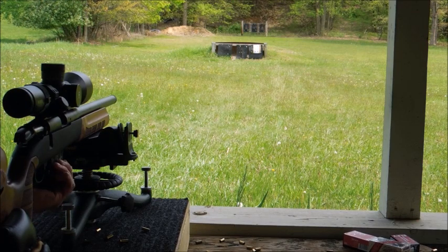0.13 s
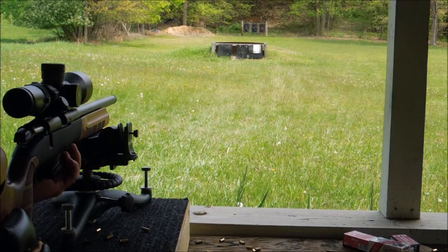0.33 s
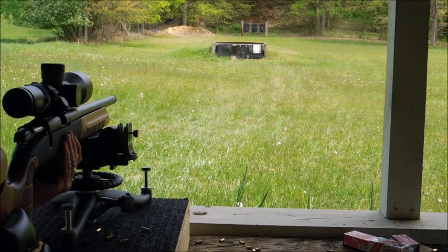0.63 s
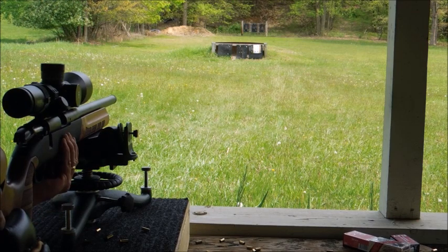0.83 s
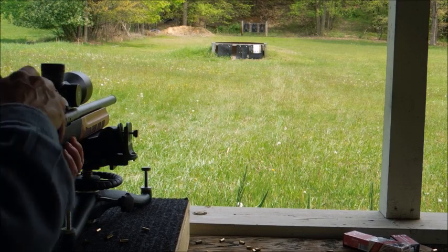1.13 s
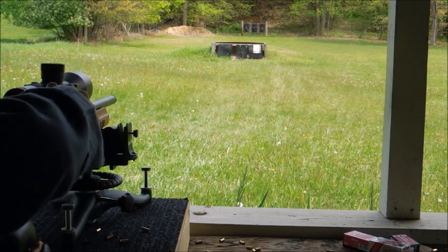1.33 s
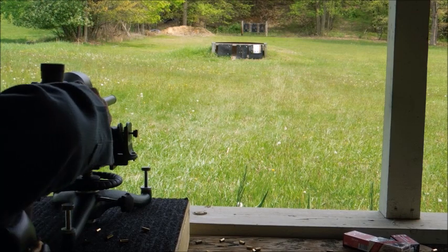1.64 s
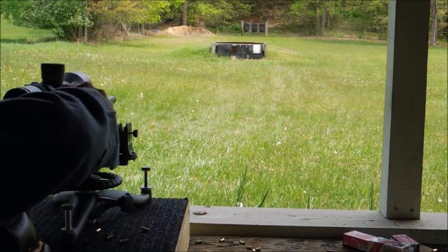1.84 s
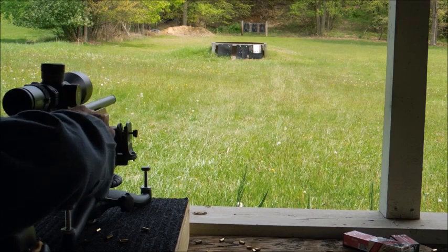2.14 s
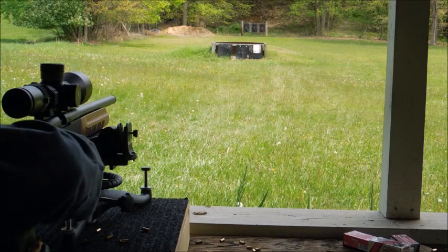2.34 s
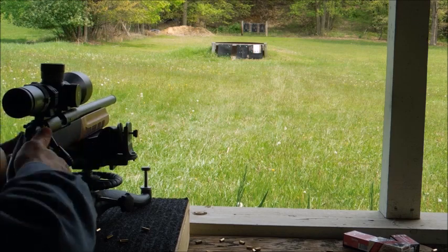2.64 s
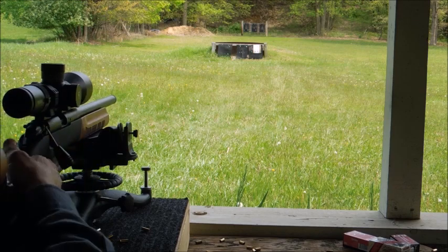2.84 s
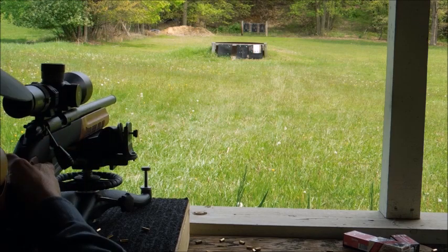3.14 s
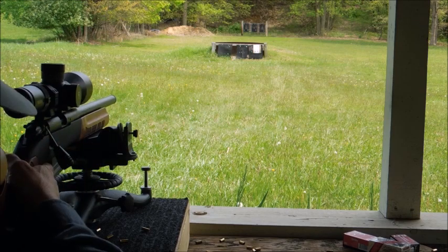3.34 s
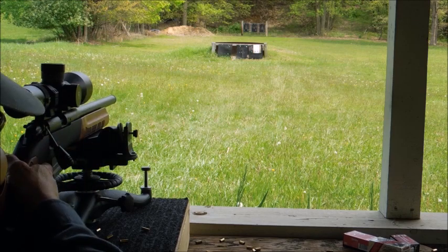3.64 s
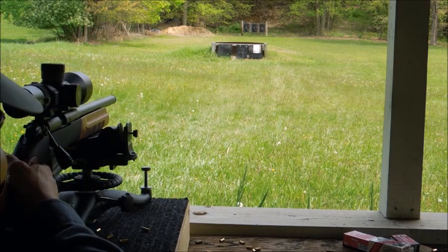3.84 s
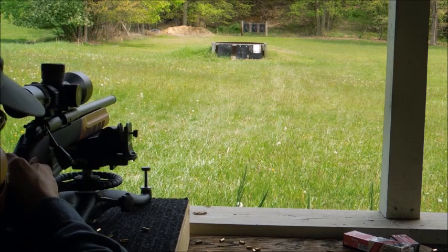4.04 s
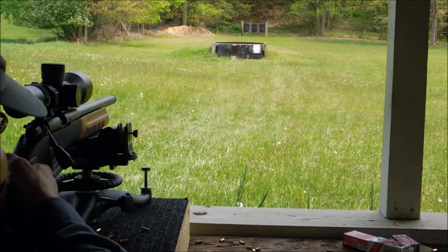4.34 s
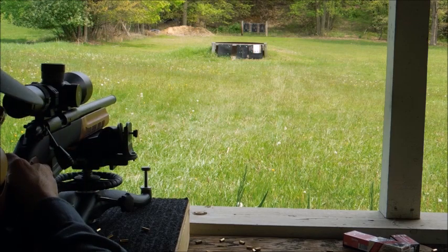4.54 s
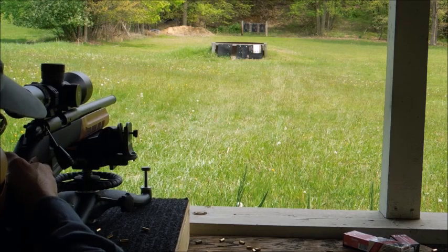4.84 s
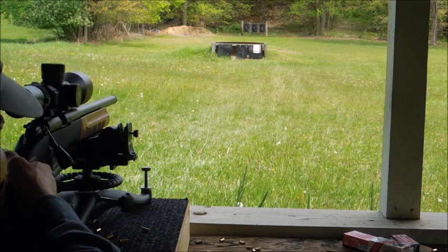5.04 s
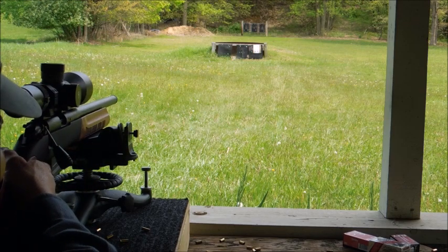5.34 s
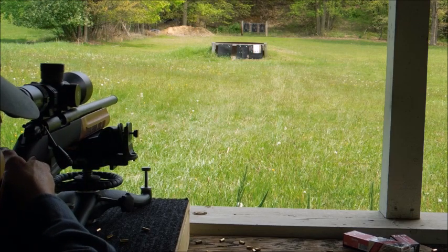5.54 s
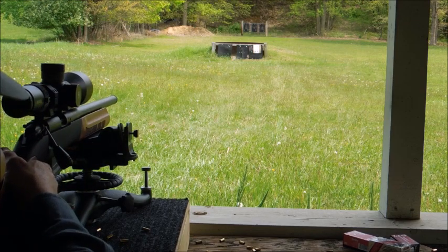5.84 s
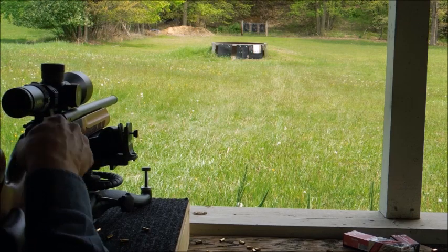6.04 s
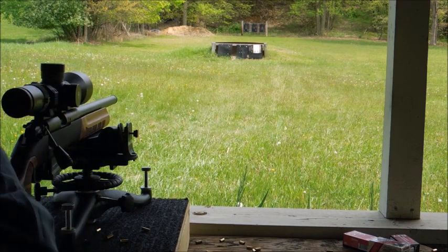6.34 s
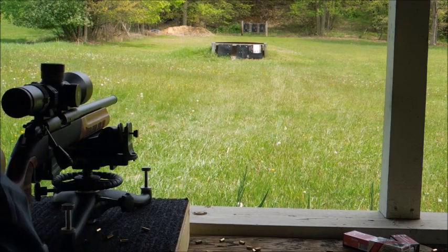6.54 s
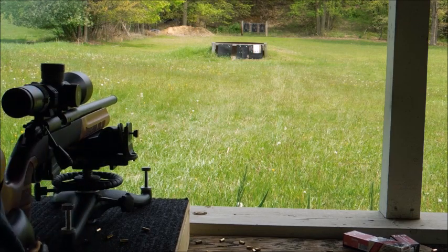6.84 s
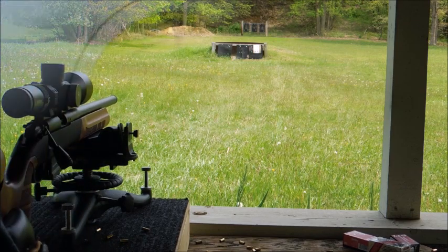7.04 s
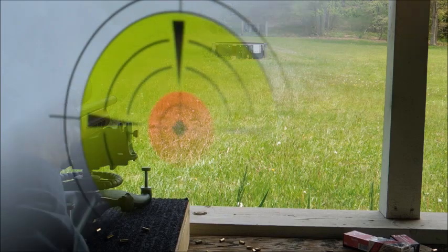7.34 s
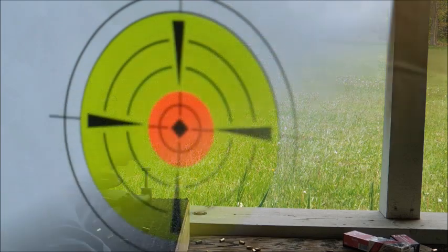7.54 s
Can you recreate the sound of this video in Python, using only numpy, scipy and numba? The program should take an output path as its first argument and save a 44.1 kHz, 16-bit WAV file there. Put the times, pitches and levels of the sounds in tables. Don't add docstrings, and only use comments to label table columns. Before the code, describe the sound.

Close steel clacks, scraping slides and wooden thuds from a rifle being worked, then quiet open air with a chirping bird and distant engine.

```python
import sys
import numpy as np
from scipy import signal
from scipy.fft import rfft, irfft
from scipy.io import wavfile
from scipy.ndimage import uniform_filter1d
from numba import njit

SR = 44100
rng = np.random.default_rng(int(sys.argv[2]) if len(sys.argv) > 2 else 0)


def how_loud(loudness_db):
    steps = np.asarray(loudness_db, float) / 20
    return 10 ** steps


def materialize(psi):
    bounded = np.clip(np.atleast_2d(psi).T, -1, 1)
    quanta = np.round(bounded * 32767).astype(np.int16)
    wavfile.write(sys.argv[1], SR, quanta)


N = 339129
FADE_S, FADE_DB = (6.7, 7.13), -4.5


def unit(x):
    return x / np.sqrt(np.mean(x ** 2))


def curve(s, values):
    return np.interp(np.arange(N) / SR, s, values)


def on_log(hz, table):
    table_hz, values = np.transpose(table)
    return np.interp(np.log(hz), np.log(table_hz), values)


def colour(x, table):
    hz = np.maximum(np.arange(N // 2 + 1) * SR / N, 1)
    return irfft(rfft(x) * how_loud(on_log(hz, table)), N)


def band(x, lo_hz, hi_hz):
    sos = signal.butter(2, [lo_hz, min(hi_hz, .45 * SR)], "band", fs=SR, output="sos")
    return signal.sosfilt(sos, x)


def walk(rate):
    k = int(SR / rate)
    held = np.repeat(rng.standard_normal(N // k + 2), k)
    return 1.3 * uniform_filter1d(uniform_filter1d(held, k), k)[:N]


def pair(likeness):
    mid, side = rng.standard_normal((2, N))
    c = np.clip(likeness, 0, 1)
    return np.sqrt((1 + c) / 2) * mid + np.sqrt((1 - c) / 2) * side * np.array([[1], [-1]])


@njit
def ring(push, hz, t60, gain, count):
    out = np.zeros(count)
    for k in range(len(hz)):
        p, z = np.exp(2j * np.pi * hz[k] / SR - np.log(1000) / (t60[k] * SR)), 0j
        for i in range(min(count, len(push) + int(t60[k] * SR))):
            z = z * p + (push[i] if i < len(push) else 0.)
            out[i] += gain[k] * z.imag
    return out


def add(track, s, sound, peak_db):
    i = int(s * SR)
    sound = sound[..., :N - i]
    start_rms = np.sqrt(np.mean(np.atleast_2d(sound)[0, :350] ** 2))
    track[..., i:i + sound.shape[-1]] += sound * how_loud(peak_db) / (3 * start_rms)


def stroke(start, hardest, end):
    return curve([start, hardest, end], [0, 1, 0]) ** 0.84


def fade_db():
    return curve(FADE_S, [0, FADE_DB])


# f/Hz, level/dB per Hz
AIR_SPECTRUM = [(2.9, -41), (5.0, -8), (54, -10), (105, -3.5), (152, -11.5), (213, -8.5), (288, -13),
                (364, -14.5), (430, -14.5), (643, -17), (4640, -28), (7180, -31.5), (11900, -30),
                (13600, -29), (15000, -52)]
# f/Hz, left-right correlation
AIR_LIKENESS = [(30, 0.8), (110, 0.29), (200, 0.86), (400, 0.61), (2300, 0.41), (4300, 0.041), (13000, .08)]
# start t/s, hardest t/s, end t/s, rise level/dB
LEANING = [
    (-0.05, 0.0, 0.21, 12),
    (0.143, 0.42, 0.63, 3.5),
    (0.554, 0.805, 1.15, 4.5),
    (1.5, 1.65, 1.88, 2),
    (1.72, 1.963, 2.2, 7),
    (2.45, 2.65, 3.12, 3),
    (3.5, 3.792, 4.17, 0.5),
]
AIR_DB, HISS_DB = -50.5, -52.5


def air():
    stir_db = sum(stroke(*when) * db for *when, db in LEANING) + fade_db()
    low, high = 0, 0
    for hz in 6.25 * 2 ** np.arange(0, 11.3, .5):
        noise = band(pair(on_log(hz, AIR_LIKENESS)), hz / 2 ** 0.45, hz * 2 ** 0.21)
        noise = noise * how_loud(on_log(hz, AIR_SPECTRUM) + 1.4 * walk(4.2))
        if hz > 700:
            high = high + noise
        else:
            low = low + noise
    return unit(low) * how_loud(AIR_DB + stir_db) + unit(high) * how_loud(HISS_DB + 1.2 * stir_db)


# multiple of the shaft rate, level/dB
SHAFT_ORDERS = [(2, -7.5), (4, -13.5), (5, 1.5), (7, -8), (8, -14.5), (9, -8), (10, -9.5), (11, -8),
                (14, -17)]
SHAFT_HZ, DRONE_HZ, DRONE_DB = 20.3, 116.3, -6
ENGINE_DB, ENGINE_FADE_DB_PER_S = -56, -5


def engine():
    turn = 2 * np.pi * np.cumsum(SHAFT_HZ * (1 + .002 * walk(1.5))) / SR
    hum = 0
    for order, db in SHAFT_ORDERS:
        tone = np.sqrt(2) * np.sin(order * turn + 2 * np.pi * rng.random())
        hum = hum + how_loud(db + 0.83 * walk(9.0)) * tone
    drone = unit(band(rng.standard_normal(N), DRONE_HZ - 1.5, DRONE_HZ + 1.5))
    since_fade = np.maximum(np.arange(N) / SR - FADE_S[0], 0)
    return (hum + how_loud(DRONE_DB) * drone) * how_loud(ENGINE_DB + ENGINE_FADE_DB_PER_S * since_fade)


# t/s, length/s, from f/Hz, held f/Hz, level/dB
HELD_NOTES = [
    (4.035, .06, 3050, 3380, -56),
    (4.32, 0.083, 2560, 2640, -64),
    (4.43, 0.059, 2800, 3090, -53),
    (4.81, .025, 2970, 3170, -56.5),
    (4.965, 0.12, 2400, 2710, -58),
    (5.905, 0.042, 2160, 2110, -56.5),
    (6.745, 0.079, 2980, 3044, -56.5),
]
# t/s, length/s, from f/Hz, to f/Hz, level/dB
GLIDING_NOTES = [(4.012, .014, 1800, 1950, -56), (4.02, 0.0235, 3550, 2880, -48.5),
                 (4.828, .028, 3160, 2615, -54.5), (5.115, 0.029, 3830, 2350, -50),
                 (5.14, 0.0352, 2490, 2150, -56.5), (5.165, .045, 2170, 2640, -55.5),
                 (5.46, .07, 2050, 1780, -57.5), (5.58, .085, 2320, 1760, -62.5),
                 (5.962, 0.024, 3250, 2350, -53.5), (6.022, .035, 3230, 2240, -52.5),
                 (6.555, .05, 2680, 3185, -57), (6.84, .07, 3030, 2450, -62), (6.9, .13, 2457, 1960, -66.5),
                 (7.06, .1, 1830, 1500, -65)]


def bird():
    def scoop(t, length):
        return 1 - np.exp(-t / 0.016)

    def glide(t, length):
        return t / length

    out = np.zeros(N)
    for notes, bend in ((HELD_NOTES, scoop), (GLIDING_NOTES, glide)):
        for s, length, from_hz, to_hz, db in notes:
            t = np.arange(int(length * SR)) / SR
            hz = from_hz + (to_hz - from_hz) * bend(t, length)
            swell = np.sin(np.pi * t / length) ** 0.63
            note = swell * np.sin(2 * np.pi * np.cumsum(hz) / SR)
            out[int(s * SR):][:len(t)] += how_loud(db + 0.5) * note
    time = np.arange(6000) / SR
    trees = rng.standard_normal((2, 6000)) * np.exp(-np.log(1000) * time / 0.32) * how_loud(-31.5)
    trees[:, 0] = 1
    return signal.fftconvolve(out[None], trees, axes=1)[:, :N]


# f/Hz, level/dB per Hz
SLEEVE_SPECTRUM = [(4000, -11), (9000, -21), (10500, -0.5), (12000, 5.5), (13500, 2), (14500, -22)]
# start t/s, hardest t/s, end t/s, level/dB
RUSTLES = [(0.02, 0.032, 0.07, -46), (0.11, 0.15, 0.3, -60), (0.71, 0.78, 0.87, -52),
           (1.2, 1.42, 1.72, -58.5), (2.58, 2.68, 2.86, -52), (2.7, 2.97, 3.2, -51), (3.1, 3.24, 3.45, -61),
           (4.14, 4.24, 4.42, -61), (5.99, 6.02, 6.24, -54), (6.1, 6.27, 6.45, -55), (6.4, 6.55, 6.9, -56),
           (7.59, 7.61, 7.78, -55)]
WEAVE_DB = -6


def sleeve():
    grains = pair(0.58) * how_loud(1.14 * walk(300) + 2.5 * walk(20))
    fine = unit(np.array([colour(g, SLEEVE_SPECTRUM) for g in grains]))
    weave = unit(band(grains, 2100, 13000))
    brush = sum(stroke(*when) * how_loud(db + 0.9) for *when, db in RUSTLES)
    return brush * (fine + how_loud(WEAVE_DB) * weave)


# f/Hz, side minus mid level/dB
SPREAD = [(60, -5.5), (110, -8), (200, -9.5), (370, -8), (690, -13), (1270, -18.5), (2340, -25),
          (4310, -10), (7930, -5), (14600, 1)]
PORCH_T60_S, PORCH_TREBLE_T60_S, PORCH_DB = 0.24, 0.15, -9


def porch(x):
    time = np.arange(N) / SR
    noise = rng.standard_normal((2, N)) * (1 - np.exp(-time / 0.0021))
    body = band(noise, 40, 9100) * how_loud(-60 * time / PORCH_T60_S)
    treble = band(noise, 6500, 13000) * how_loud(-60 * time / PORCH_TREBLE_T60_S)
    mid, side = body + treble
    tail = np.array([mid, colour(side, SPREAD)])[:, :SR // 2]
    return signal.fftconvolve(x[None], tail / np.sqrt(np.sum(mid ** 2)), axes=1)[:, :N]


# f/Hz, t60/s
STOCK_RINGS = [(770, 0.05), (1330, 0.11), (1550, 0.077)]
# t/s, peak level/dB, second ring level/dB, third ring level/dB
TAPS = [(2.509, -35.5, -14, -24), (2.551, -36.5, -20, -16), (2.612, -34.5, -17, -24), (2.655, -41, -9, -19),
        (2.734, -35, -9, -28), (2.856, -34.5, -10, -22), (2.929, -40, -5, -16), (2.979, -40, -9, -3.5),
        (2.992, -36, -18, -11), (3.019, -52, -18, -7), (3.044, -45, -16, 3), (3.069, -45, -19, -12),
        (3.29, -44.5, -21, -12), (4.231, -38, -22, -19), (4.619, -45.5, -18, -17.5), (4.789, -48, -15, -16),
        (7.383, -49, -10, -10)]


def taps():
    out = np.zeros(N)
    hz, t60 = np.transpose(STOCK_RINGS)
    for s, peak_db, second_db, third_db in TAPS:
        touched_hz = hz * (1 + 0.025 * rng.standard_normal(3))
        gain = how_loud([0, second_db + 2.5, third_db + 11])
        add(out, s, ring(np.hanning(16), touched_hz, t60, gain, 8000), peak_db - 1.1)
    return out


# t/s, peak level/dB, f/Hz, t60/s
THUDS = [(0.03, -22, 516, 0.18), (0.061, -29, 286, 0.28), (0.429, -28, 321.4, 0.29),
         (0.479, -39, 323, 0.11), (0.723, -29, 292, 0.16), (0.768, -29, 315, 0.077),
         (0.92, -15.5, 500, 0.05), (1.919, -25, 385, 0.1), (1.947, -35, 96.4, 0.15),
         (2.078, -36, 602, 0.15), (2.396, -19.5, 580, 0.068), (2.414, -23.5, 76.6, 0.2),
         (2.44, -27, 171, 0.12), (2.581, -41, 119, 0.05), (2.617, -41, 345, 0.12),
         (2.655, -35.5, 388, 0.18), (2.677, -42, 304, 0.08), (2.452, -23.5, 90, 0.19),
         (2.859, -34, 103, 0.08), (2.878, -35, 229, 0.12), (3.121, -33.5, 424, 0.17),
         (3.173, -40, 170, 0.08), (2.478, -34, 75, 0.1), (3.258, -38.5, 104.7, 0.11),
         (3.591, -31.5, 104, 0.072), (3.629, -31, 267, 0.15)]


def thuds():
    out = np.zeros(N)
    count = 15000
    time = np.arange(count) / SR
    for s, peak_db, hz, t60 in THUDS:
        detune, strength = rng.standard_normal((2, 6))
        detune[0] = 0
        ratios = np.array([1, 1.4, 2.1, 1.8, 0.38, .65]) * (1 + .05 * detune)
        gain = how_loud(-5 * (ratios != 1) + 4.3 * strength)
        body = ring(np.hanning(110), hz * ratios, t60 / ratios ** 0.067, gain, count)
        crunch = band(rng.standard_normal(count), min(150, .7 * hz), min(930, 3.1 * hz))
        crunch = crunch * (1 - np.exp(-time / 0.0017)) * how_loud(-60 * time / t60)
        add(out, s, unit(body) + how_loud(-4.0) * unit(crunch), peak_db)
    return out


# start t/s, hardest t/s, end t/s, level/dB, high share level/dB
SLIDES = [
    (0.0, 0.026, 0.03, -43, -18),
    (0.308, 0.34, 0.39, -36, -20),
    (0.356, 0.404, 0.433, -24, -15),
    (0.425, 0.436, 0.49, -27, -18),
    (1.715, 1.75, 1.72, -36.5, -10),
    (1.784, 1.793, 1.85, -25.5, -9.5),
    (1.825, 1.848, 1.9, -20, -3),
    (1.893, 1.932, 2.03, -21.5, -4.5),
]


def slides():
    ticks = (rng.random(N) < 3000 / SR) * rng.standard_normal(N) * how_loud(1.3 * walk(150))
    hz = rng.uniform(2300, 14000, size=160)

    def scrape(rings_hz):
        count = len(rings_hz)
        body = ring(np.ones(1), rings_hz, np.full(count, .02), rng.standard_normal(count), 2000)
        return unit(signal.fftconvolve(ticks, body)[:N])

    dull, bright = scrape(hz[hz < 6000]), scrape(hz[hz >= 6000])
    out = np.zeros(N)
    for *when, db, high_db in SLIDES:
        out += stroke(*when) * how_loud(db - 7) * (dull + how_loud(high_db) * bright)
    return out


STEEL_BAND_HZ = [1300, 4000, 10000]


def steel_tone(hz, low_db, high_db):
    tilt = how_loud(np.interp(np.log(hz), np.log(STEEL_BAND_HZ), [low_db + 13, 0, high_db]))
    return tilt / (1 + (880 / hz) ** 4) / (1 + (hz / 14000) ** 6)


# f/Hz, level/dB, share of the blow's t60
STEEL = [(1050, -5.5, 1.3), (1595, -2, 0.72), (2400, -6.5, 0.63), (3360, -3.5, 0.9), (4373, -10, .9),
         (5450, -9.5, 1.1), (6460, -8, 1.9), (8480, -4, .8), (11910, -1, 0.59)]
# t/s, peak level/dB, high share level/dB, loudest ring f/Hz
HANDLE = [
    (0.029, -14, -7, 1579),
    (0.1228, -30, -1, 1033),
    (0.6466, -24.5, -32.5, 1544),
    (0.6965, -26, -23.5, 1069),
    (0.7245, -21, -26.5, 1535),
    (1.2124, -34, -33.5, 1390),
    (2.3955, -14, 12, 12020),
    (2.4991, -39.5, -20, 1294),
    (2.5975, -40, 19, 1170),
]
# t/s, peak level/dB, high share level/dB, loudest ring f/Hz
RATTLE = [(0.3045, -21.5, 2, 8350), (0.3112, -16.5, -0.5, 1050), (0.3673, -19, 1, 8300),
          (0.3824, -21, -16.5, 3270), (0.4008, -18, -5.5, 4300), (0.4327, -22.5, -40, 1634),
          (1.723, -30, -17.5, 2726), (1.7885, -14, -9.5, 4203), (1.8347, -18.5, -25.5, 3995),
          (1.8441, -18, 0, 2507), (1.8851, -8, 2, 3495)]
# t/s, peak level/dB, high share level/dB, loudest ring f/Hz
TICKS = [
    (0.4274, -13.5, -16, 1570),
    (0.828, -27, -10, 3360),
    (0.8603, -31.5, -18, 3390),
    (0.8732, -42, -9, 3360),
    (1.1353, -41, -11, 3620),
    (0.9048, -2.5, -10.5, 3360),
    (1.5613, -27.5, -10, 1683),
    (2.0864, -10, -8.5, 8300),
    (2.4194, -33, -22, 3530),
    (3.5906, -30.5, -5.5, 5200),
]
# t/s, peak level/dB, high share level/dB,
# loudest ring f/Hz
SLAMS = [
    (0.9256, 8.5, -1, 8504),
    (0.9307, 1, -7, 8480),
    (1.9158, 5, -3.5, 6460),
    (2.0793, -2.5, 7.5, 8720),
    (2.4034, -17.5, -34, 3504),
]
# blows, low share level/dB, t60/s
CONTACTS = [(HANDLE, -3.5, .08), (RATTLE, -16, 0.12), (TICKS, -14, 0.063), (SLAMS, -23, 0.087)]


def knocks():
    out = np.zeros((2, N))
    named_hz, named_db, named_share = np.transpose(STEEL)
    time = np.arange(10000) / SR
    edges = 500 * 2 ** np.arange(0, 5.1, .5)
    centres = np.sqrt(edges[1:] * edges[:-1])
    blows = sorted((*blow, low_db, t60) for rows, low_db, t60 in CONTACTS for blow in rows)
    for s, peak_db, high_db, lead_hz, low_db, t60 in blows:
        def fade(hz):
            mode_t60 = t60 * (hz / 4000) ** -.25
            return (1 - np.exp(-time / 0.00033)) * how_loud(-60 * time / mode_t60)

        chatter = how_loud(3.1 * np.repeat(rng.standard_normal(250), 40) * np.exp(-time / 0.042))
        sound = np.zeros((2, len(time)))
        for lo, hi, hz in zip(edges, edges[1:], centres):
            thicket = band(rng.standard_normal((2, len(time))), lo, hi) * fade(hz) * chatter
            sound += thicket * steel_tone(hz, low_db, high_db) * how_loud([[0], [on_log(hz, SPREAD)]])

        strength, phases, sides = rng.standard_normal((3, 10))
        rings_hz = np.append(named_hz, lead_hz)
        rings_db = np.append(named_db - 13.5 + 5.7 * strength[:9], -7.5 - 0.16 * peak_db)
        shares = np.append(named_share, .68)
        for hz, db, share, phase, side in zip(rings_hz, rings_db, shares, phases, sides):
            wander = np.cumsum(0.088 * rng.standard_normal(len(time)))
            tone = np.sin(2 * np.pi * hz * time + 3 * phase + wander) * fade(hz) ** (1 / share) * chatter
            tone = tone * how_loud(db) * steel_tone(hz, low_db, high_db)
            sound += tone * np.array([[1], [side * how_loud(on_log(hz, SPREAD))]])
        add(out, s, sound, peak_db)
    return out


def scene():
    mid, side = knocks()
    mid = mid + slides() + thuds() + taps()
    wet_mid, wet_side = how_loud(PORCH_DB) * porch(mid)
    near = mid + wet_mid + (side + wet_side) * np.array([[1], [-1]])
    left_db = 0.24
    balance = how_loud(np.array([[left_db], [-left_db]]) / 2)
    return (near + air() + sleeve() + engine() + bird()) * balance


def band_limit(x):
    return signal.sosfilt(signal.butter(12, 15200, fs=SR, output="sos"), x)


def record(dry):
    top_hz = 14150
    cut = signal.sosfilt(signal.ellip(10, .3, 60, top_hz, fs=SR, output="sos"), dry)
    return band_limit(np.clip(cut, -1, 1))


dry = scene()
out = record(dry)
materialize(out)
```